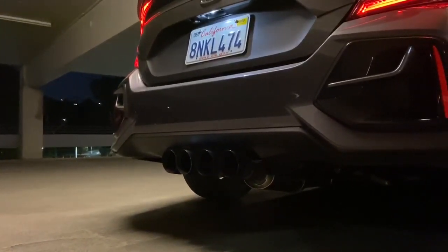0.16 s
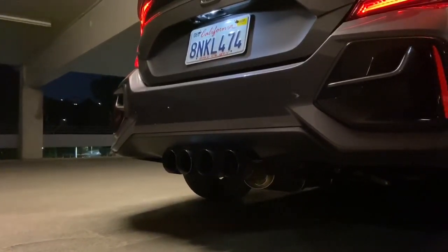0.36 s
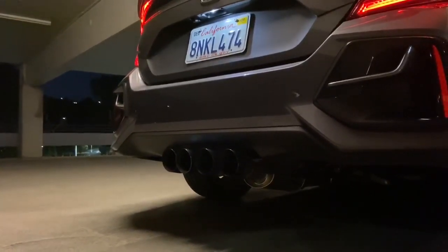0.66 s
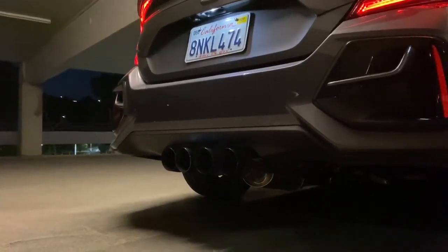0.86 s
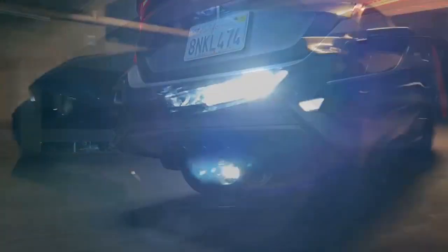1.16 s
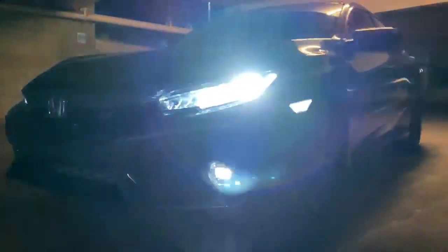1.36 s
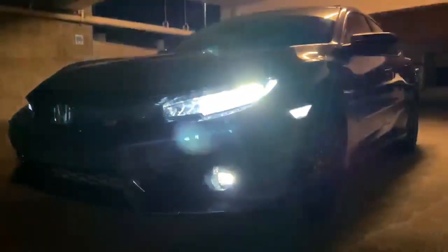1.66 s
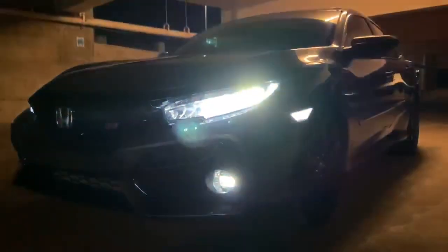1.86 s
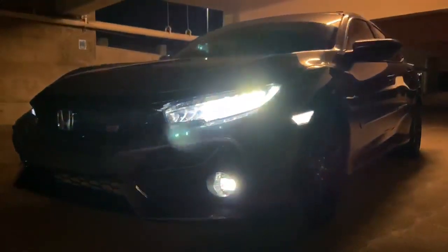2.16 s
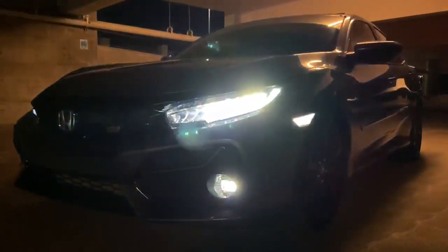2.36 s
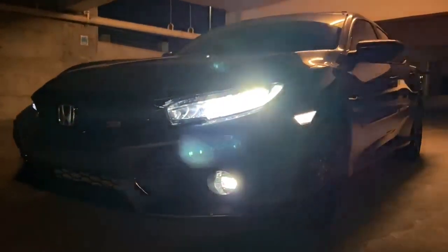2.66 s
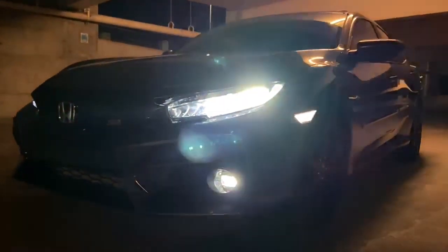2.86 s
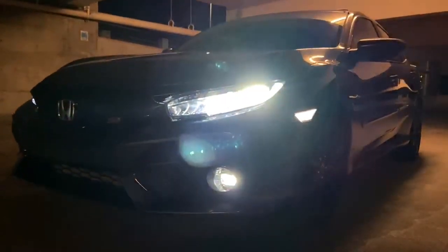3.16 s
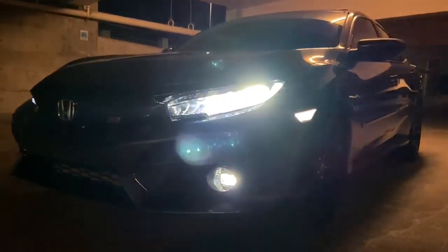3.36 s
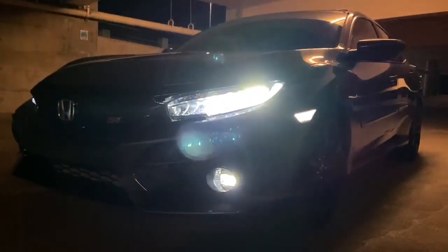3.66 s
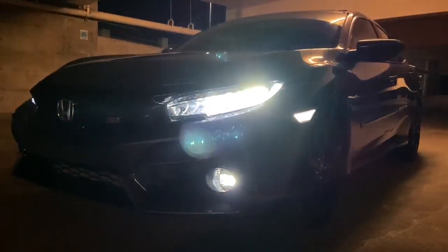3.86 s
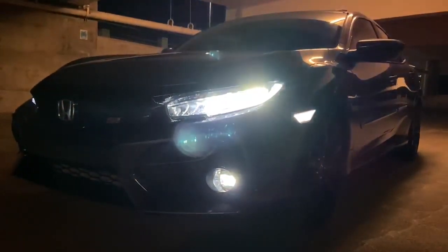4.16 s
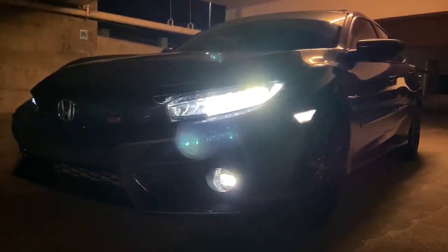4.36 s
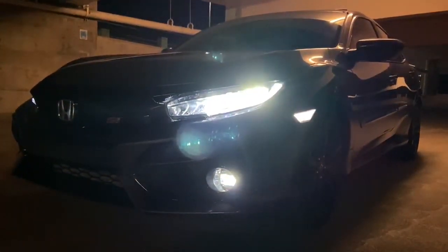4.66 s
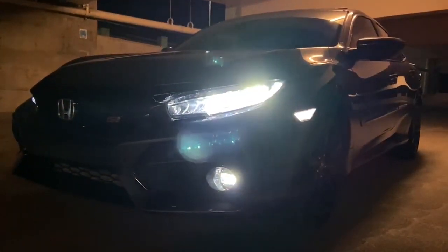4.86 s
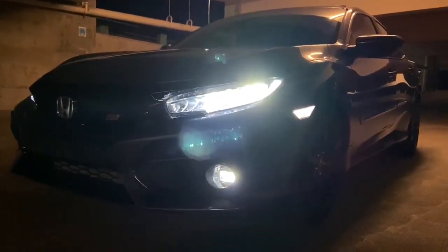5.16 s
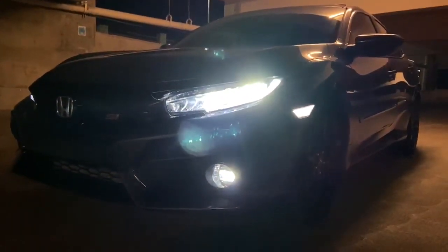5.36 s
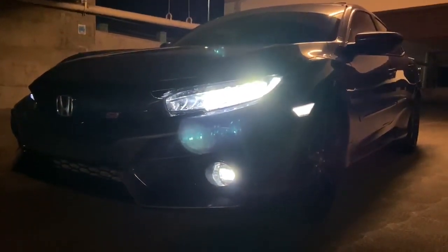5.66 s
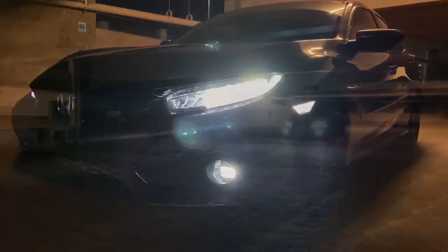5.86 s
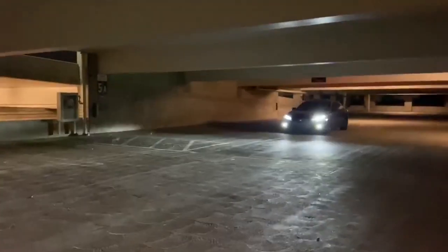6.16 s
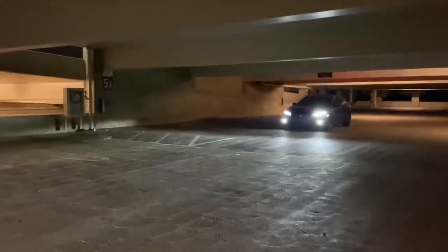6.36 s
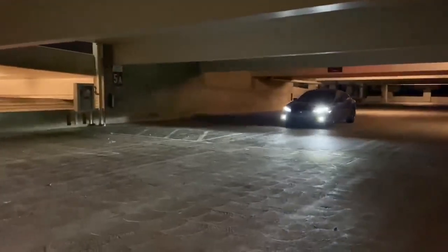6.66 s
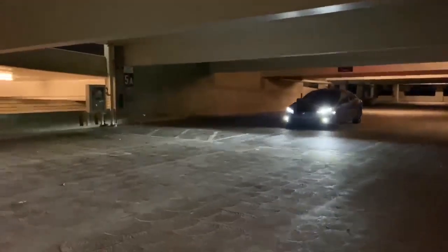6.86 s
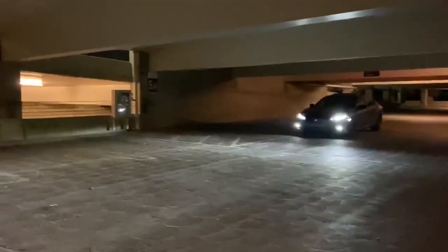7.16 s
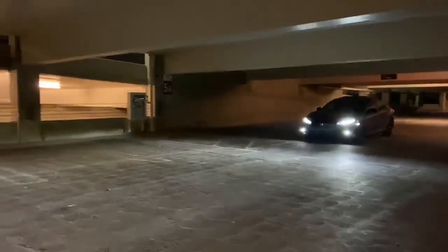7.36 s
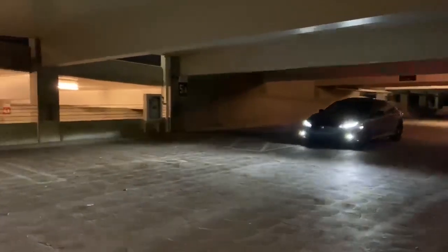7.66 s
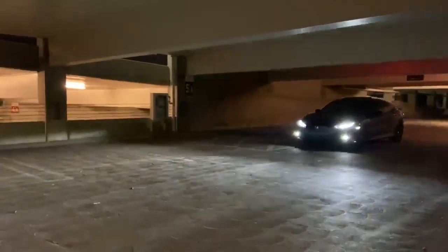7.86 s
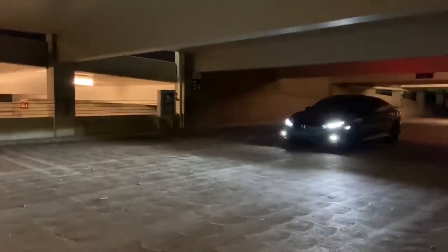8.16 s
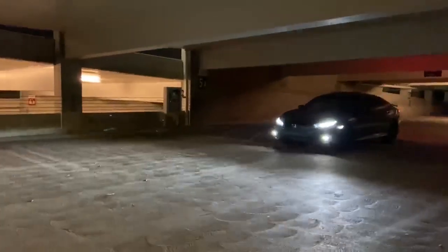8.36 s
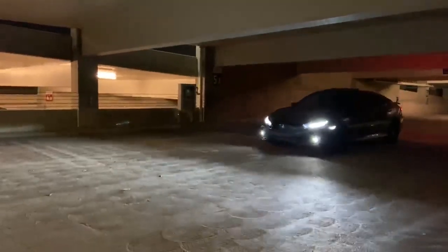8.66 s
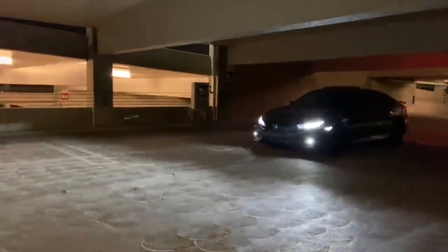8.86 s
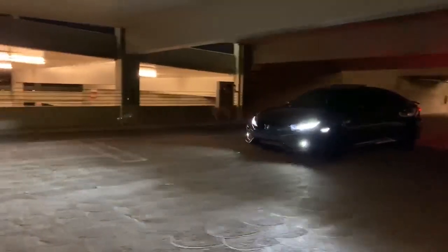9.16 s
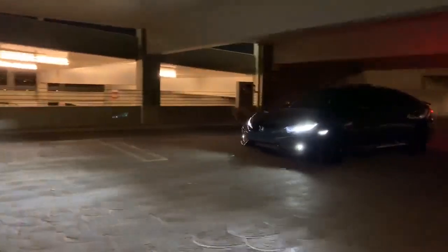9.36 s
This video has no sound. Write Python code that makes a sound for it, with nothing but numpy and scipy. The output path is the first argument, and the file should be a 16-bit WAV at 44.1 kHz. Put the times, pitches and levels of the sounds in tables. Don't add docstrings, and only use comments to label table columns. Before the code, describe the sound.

From 0 to 1.3 s, close behind the tailpipes, deep exhaust beats slow and separate into a lumpy idle, with faint airy hiss and very high injector ticking. A crossfade moves beside the bonnet: a low clack at 1.3 s and tiny relay ticks to 1.6 s. The first blip barks roughly upward from about 1.6 s, air rushing with boost, peaking near 2.4 s as a short bypass puff escapes. The pitch sinks smoothly, its hum fading in and out, until 3.7 s. A second, higher blip peaks near 4.2 s; a click and longer fluttering puff follow, then another slow fall to 5.8 s. From about 6 s to the end, across the reverberant concrete garage, the car creeps nearer: a low, unsteady drone with rumble, soft hiss and faint belt whine, growing fuller and boomier from 9 s. Stereo sound, centred bass, dull patchy treble.

```python
import sys
import numpy as np
from scipy import signal
from scipy.fft import rfft, irfft, next_fast_len
from scipy.io import wavfile
from scipy.ndimage import uniform_filter1d, map_coordinates

SR = 44100
rng = np.random.default_rng(int(sys.argv[2]) if len(sys.argv) > 2 else 0)


def materialize(psi):
    bounded = np.clip(np.atleast_2d(psi).T, -1, 1)
    quanta = np.round(bounded * 32767).astype(np.int16)
    wavfile.write(sys.argv[1], SR, quanta)


def linear_from_db(decibels):
    return 10 ** (np.asarray(decibels, float) / 20)


N = 418509

# freq_hz, likeness
LIKENESS = [(60, 1), (130, 0.83), (290, 0.71), (640, 0.4), (1400, 0.38), (2500, 0.2), (4500, 0.39),
            (15000, 0.11)]
# freq_hz, t60_s
REVERB = [(50, 4), (500, 1.43), (3000, 0.56), (12000, 0.18)]

# time_s, firing_hz, exhaust_db
REAR_SPEED = [(0, 43.59, -13.5), (.2, 39.3, -19.5), (.4, 36.5, -18.5), (.6, 32.51, -21), (.9, 29.48, -20),
              (1.04, 28.62, -21.5), (1.35, 26.7, -36)]
# freq_hz, level_db
REAR_PIPE = [(20, -45), (40, -17), (58, 0), (72, -4), (88, -3), (125, -7), (175, -16), (222, -16),
             (265, -28), (350, -25), (460, -37), (1000, -100)]
# freq_hz, level_db
REAR_RUSH = [(200, -42), (500, -11), (900, -22), (2000, -29.5), (3500, -35), (7000, -41), (11000, -45),
             (15700, -45)]
# freq_hz, level_db
INJECTOR_COLOUR = [(8000, -39), (9700, 0), (12400, 7), (14000, 1), (15700, -6)]

# time_s, firing_hz
BLIP_SPEED = [(1.5, 28), (1.6, 33), (1.824, 58), (2.039, 85.8), (2.208, 114.2), (2.308, 127.6),
              (2.383, 132.2), (2.47, 131.3), (3, 116.1), (3.715, 97.7), (3.77, 100), (4.064, 143.6),
              (4.13, 150.5), (4.19, 153.4), (4.513, 144.6), (5.047, 127.7), (5.71, 108.8), (6.2, 95.5)]
# open_s, vent_s, bark_db, rumble_db, ease_s
THROTTLE_BLIPS = [
    (1.556, 2.375, -18, -25.5, 2.36),
    (3.722, 4.29, -16.5, -28.5, 4.1),
]
# firing_hz, level_db
COASTING_BARK = [(28, -45), (98, -33), (101.5, -27), (103.5, -35), (106.5, -23), (109.3, -34), (113, -28),
                 (135, -33)]
# freq_hz, width_hz, gain_db
FRONT_PIPE = [(60, 25, -8), (100, 30, -8), (258, 20, -1), (286, 16, -1), (330, 30, -1), (386, 22, -1),
              (435, 40, -11)]
# freq_hz, level_db
BODY_RUMBLE = [(25, -61), (45, -29), (56, 2), (70, -7.5), (90, 0.5), (150, -5.5), (200, -12.5), (300, -15),
               (500, -71.5)]
# freq_hz, level_db
FRONT_RUSH = [(200, -9.5), (420, -2), (700, -3.5), (1000, -8), (1240, -8.5), (1450, -12.5), (1880, -12),
              (3000, -16.5), (6500, -23.5), (10000, -27.5), (15700, -28)]
# freq_hz, width_hz, gain_db
BAY_PANELS = [(605, 30, 2), (768, 25, 4), (1240, 70, 3), (1560, 55, 4), (1860, 70, 4), (2260, 70, 0),
              (2660, 70, 1), (2890, 40, 1), (3770, 40, 2), (6420, 50, 4)]
# time_s, peak_db, freq_hz, sharpness_q
CLICKS = [
    (1.333, -29, 800, 1.2),
    (1.485, -39, 4500, 3),
    (1.545, -38, 6500, 5),
    (1.578, -36, 6500, 5),
    (1.62, -38, 6300, 5),
    (2.295, -30, 11800, 3),
    (4.245, -23, 6000, 3),
]
# firing_hz, level_db
FIRING_TONE = [(28, -57), (41, -30), (58, -16), (78, -12.5), (100, -14.5), (120, -15), (140, -16.5),
               (153, -15.5)]
# firing_hz, half_width_hz, depth_db
TONE_NULLS = [(67, 8, 6), (85.8, 6, 7), (98, 3, 4), (103.3, .9, 7), (106.5, 1, 14), (109, 1.5, 26),
              (119.7, 1.2, 12), (126, 2, 4), (131.6, .5, 8), (137.1, 2, 10), (147.5, 2.8, 14),
              (151.3, .6, 7)]
# firing_hz, level_db
SECOND_ORDER = [(28, -36), (33, -30), (60, -31.5), (95, -47.5), (108, -35.5), (118, -43), (128, -28),
                (137, -46.5), (145, -30), (153, -48)]
# time_s, length_s, level_db
PUFFS = [
    (2.319, 0.05, -23.5),
    (4.277, 0.082, -30.5),
]
# freq_hz, width_hz, gain_db
INTAKE_PIPE = [(630, 30, 6), (765, 30, 5), (1240, 120, -8), (1555, 55, -6), (1870, 80, -9), (2660, 60, -9),
               (3320, 80, -12), (6450, 150, -14)]
# freq_hz, left_over_right_db
STEREO_LEAN = [(60, .4), (125, 1.2), (600, 1.6), (2500, 3.4), (5000, 3), (9000, 0)]

# time_s, firing_hz, drone_db
CREEP_SPEED = [(5.85, 48.68, -39), (6.04, 48.18, -21), (6.2, 47.24, -22), (6.75, 50.47, -24.5),
               (6.9, 52.23, -25), (7.08, 52.05, -24), (7.2, 52.27, -19.5), (7.61, 54.84, -19.5),
               (7.8, 54.8, -23.5), (8.09, 55.46, -16.5), (8.25, 55.12, -21.5), (8.97, 55.04, -22),
               (9.23, 52.65, -14.5), (9.4, 52.4, -23), (9.49, 54.2, -21.5)]
# freq_hz, level_db
FAR_PIPE = [(47, -54), (80, 2.5), (113, 1.5), (134, -5), (167, -3.5), (193, -12.5), (215, -14),
            (700, -30.5), (910, -53), (1540, -120)]
# freq_hz, level_db
FAR_RUSH = [(100, -9.5), (250, 0.5), (600, -7), (1000, -11), (1330, -11.5), (2500, -19), (5500, -30.5),
            (8000, -31.5), (11000, -27.5), (15700, -39)]
# start_s, end_s, order, level_db
ORDER_SWELLS = [(6.879, 7.018, 2, -28), (7.17, 7.247, 2, -38), (8.18, 8.47, 2, -35), (8.68, 8.93, 2, -34),
                (9.304, 9.418, 2, -24), (7.149, 7.181, 3, -35), (7.684, 7.742, 3, -33),
                (7.9, 8.35, 3, -44.5), (8.64, 8.88, 3, -32), (9.15, 9.3, 3, -31.5)]
# start_s, end_s, pitch_hz, level_db
BELT_WHINES = [
    (7.1, 8.2, 1335, -63),
    (8.72, 9.05, 2013, -57.5),
]

# low_edge_hz, share_lost_idle, share_lost_revs, share_lost_far, revs_gain_db
MID_DROPOUTS = [(8300, .94, .8, .9, 0), (8700, .99, .99, .99, 0), (9600, 0, 0, 0, 5), (9900, 0, .2, 0, 2),
                (10400, 0, .42, 0, 3), (10900, 0, .6, .1, 3), (11400, 0, .93, .4, 0), (11950, 0, .03, 0, 4),
                (12500, .97, .92, .6, 0), (12750, .97, .2, .6, 0), (13100, .97, .2, .85, 0),
                (13500, .97, .97, .85, 0), (13800, .3, .05, .2, 6), (14350, .25, .82, .45, 2),
                (15000, .25, .25, .4, 2)]
# low_edge_hz, share_lost_idle, share_lost_revs, share_lost_far, revs_gain_db
SIDE_DROPOUTS = [(6300, .4, .4, .4, 0), (6900, .94, .94, .94, 0), (7600, 0, 0, 0, 4), (9050, 0, .85, 0, 0),
                 (9700, 0, .55, 0, 0), (10400, .98, .65, .65, 0), (11000, .98, .85, .85, 0),
                 (11750, 0, 0, 0, 4), (12150, 0, .88, 0, 0), (14200, 0, 0, 0, 0), (14650, .96, .96, .96, 0)]
# start_s, end_s
REVS_SPAN = [2.33, 6.2]


def unit(x):
    return x / np.sqrt(np.mean(x ** 2) + 1e-20)


def along(points, hz):
    f, v = np.transpose(points)
    return np.interp(np.log(hz + 1), np.log(f + 1), v)


def curves(rows):
    time_s, *columns = np.transpose(rows)
    return [np.interp(np.arange(N) / SR, time_s, c) for c in columns]


def fade(start_s, end_s, edge_s):
    t = np.arange(N) / SR
    return np.clip((t - start_s) / edge_s + 1, 0, 1) * np.clip((end_s - t) / edge_s + 1, 0, 1)


def wobble(rate_hz):
    knots = rng.standard_normal(int(N * rate_hz / SR) + 4)
    return map_coordinates(knots, [np.arange(N) * rate_hz / SR])


def steady(x, window_s):
    power = uniform_filter1d(x ** 2, int(window_s * SR))
    return x / np.sqrt(np.abs(power) + 1e-12)


def filtered(x, response):
    m = next_fast_len(N + SR // 2)
    return irfft(rfft(x, m) * response(np.fft.rfftfreq(m, 1 / SR)), m)[..., :N]


def causal(spectrum):
    def response(hz):
        cepstrum = irfft(np.log(linear_from_db(along(spectrum, hz)) + 1e-6))
        cepstrum[1:len(hz) - 1] *= 2
        cepstrum[len(hz):] = 0
        return np.exp(rfft(cepstrum))
    return response


def resonant(modes):
    def response(f):
        total = 0
        for k, (centre, width, db) in enumerate(modes):
            total = total + (-1) ** k * linear_from_db(db) * 1j * f * width / (centre ** 2 - f * f + 1j * f * width)
        return total
    return response


def stereo_angle(hz):
    return np.arccos(np.clip(along(LIKENESS, hz), -1, 1)) / 2


def rush(spectrum, patchy_db):
    z = signal.stft(rng.standard_normal((2, N)), nperseg=512)[2]
    patches = uniform_filter1d(rng.standard_normal(z.shape[1:]), size=6, axis=0)
    patches = unit(uniform_filter1d(patches, size=12, axis=1))
    pair = signal.istft(z * linear_from_db(patchy_db * patches), nperseg=512)[1][:, :N]

    def colour(hz):
        angle = stereo_angle(hz)
        return linear_from_db(along(spectrum, hz)) * [np.cos(angle), np.sin(angle)]
    mid, side = filtered(pair, colour)
    return unit(np.array([mid + side, mid - side]))


def firings(rate_hz, cylinders_db, scatter_db, jitter):
    at = np.flatnonzero(np.diff(np.floor(np.cumsum(rate_hz) / SR + .9)))
    chance = rng.standard_normal((len(at), 2))
    size = linear_from_db(np.resize(cylinders_db, len(at)) + scatter_db * chance[:, 0])
    at = np.clip(at + jitter * chance[:, 1] * SR / rate_hz[at], 0, N - 1).astype(int)
    return np.bincount(at, size, N)


def tone(rate_hz, db, unsteady_db):
    level = np.sqrt(2) * linear_from_db(db + unsteady_db * wobble(18))
    return level * np.sin(2 * np.pi * np.cumsum(rate_hz) / SR)


def throb(rate_hz, depth):
    return 1 + depth * np.cos(2 * np.pi * np.cumsum(rate_hz) / SR)


def garage(x, wet_db):
    hz, t, z = signal.stft(rng.standard_normal((2, SR)), SR, nperseg=1024)
    angle = stereo_angle(hz)[:, None]
    mid, side = z[0] * np.cos(angle), z[1] * np.sin(angle)
    decay = linear_from_db(-60 * t / along(REVERB, hz)[:, None])
    tail = signal.istft(np.array([mid + side, mid - side]) * decay, SR, nperseg=1024)[1]
    tail = tail / np.linalg.norm(tail[0])
    delayed = np.pad(x, (700, 0))[None]
    return x + linear_from_db(wet_db) * signal.fftconvolve(delayed, tail, axes=1)[:, :N]


def tailpipe_beats(rate_hz, pulse_db):
    lead = SR // 2
    early_hz = np.r_[np.full(lead, rate_hz[0]), rate_hz[:-lead]]
    pulses = -firings(early_hz, [0, -1.5, .8, -.6], scatter_db=2, jitter=.02)
    beats = garage(filtered(pulses, causal(REAR_PIPE)), wet_db=-6)
    return linear_from_db(pulse_db) * steady(np.roll(beats, -lead, axis=1), .61)


def behind():
    rate_hz, pulse_db = curves(REAR_SPEED)
    beats = tailpipe_beats(rate_hz, pulse_db)
    rush_db = -53 + 7 * np.log2(rate_hz / 30)
    hiss = linear_from_db(rush_db) * throb(rate_hz, depth=.12) * rush(REAR_RUSH, patchy_db=0)
    ticking = linear_from_db(-64.5) * throb(rate_hz, depth=.32) ** 2 * rush(INJECTOR_COLOUR, patchy_db=2)
    return (beats + hiss + ticking) * fade(0, 1.45, .12)


def blipped(column, rise_db_per_s, fall_db_per_s, floor_db):
    t = np.arange(N) / SR
    level_db = floor_db
    for blip in THROTTLE_BLIPS:
        climb_db = rise_db_per_s * np.clip(blip[0] - t, 0, None)
        drop_db = fall_db_per_s * np.clip(t - blip[1], 0, None)
        level_db = np.maximum(level_db, blip[column] - climb_db - drop_db)
    return level_db


def bark(rate_hz, load):
    rough = firings(rate_hz, [0, -2.5, 1.5, -1.5], scatter_db=2.5, jitter=.035)
    clean = firings(rate_hz, [0, -.5, .3, -.2], scatter_db=.6, jitter=.006)
    clean = filtered(clean, lambda hz: (1j * hz / 170 / (1 + 1j * hz / 170)) ** 3)
    pulses = load * rough + (1 - load) * clean
    piped = filtered(pulses, lambda hz: resonant(FRONT_PIPE)(hz) / (1 + 1j * hz / 650) ** 2)
    bark_db = blipped(2, rise_db_per_s=330, fall_db_per_s=240, floor_db=along(COASTING_BARK, rate_hz))
    return linear_from_db(bark_db - 2.5) * steady(garage(piped, wet_db=-6), .2)


def body_rumble(choke_db):
    rumble_db = blipped(3, rise_db_per_s=82, fall_db_per_s=16.6, floor_db=-38)
    return linear_from_db(rumble_db + 7 + 2.1 * choke_db) * rush(BODY_RUMBLE, patchy_db=2)


def engine_rush(rate_hz, choke_db):
    throttle = sum(fade(open_s, ease_s, .15) for open_s, *_, ease_s in THROTTLE_BLIPS)
    spooling = sum(fade(open_s, vent_s, .038) for open_s, vent_s, *_ in THROTTLE_BLIPS)
    keep = np.exp(-1 / (.46 * SR))
    boost = signal.lfilter([1 - keep], [1, -keep], spooling * (rate_hz / 100) ** 1.11)
    rush_db = -42 + 4 * np.log2(rate_hz / 28) + 12 * boost + 2 * throttle + choke_db
    panels = filtered(rush(FRONT_RUSH, patchy_db=1.36),
                      lambda hz: np.hypot(1, np.abs(resonant(BAY_PANELS)(hz))))
    return linear_from_db(rush_db) * throb(rate_hz, depth=.05) * unit(panels)


def bonnet_clicks():
    t = np.arange(SR // 20) / SR
    out = np.zeros((2, N))
    for time_s, peak_db, hz, sharpness in CLICKS:
        click = unit(signal.lfilter(*signal.iirpeak(hz, sharpness, SR), rng.standard_normal(len(t)))) / 2
        start = round(time_s * SR)
        out[:, start:start + len(t)] += linear_from_db(peak_db - 60 * t / .05) * click
    return out


def order_drone(rate_hz, load):
    tone_db = along(FIRING_TONE, rate_hz)
    for null_hz, half_width_hz, depth_db in TONE_NULLS:
        width_hz = half_width_hz * (1 + 1.2 * load)
        dip = np.clip(1 - np.abs(rate_hz - null_hz) / width_hz, 0, 1)
        filled = load * (null_hz > 135)
        tone_db = tone_db - depth_db * dip * (1 - filled)
    second_db = along(SECOND_ORDER, rate_hz) + 11.5 * load
    drone = tone(rate_hz, tone_db + 1.5, unsteady_db=2.34) + tone(2 * rate_hz, second_db, unsteady_db=0)
    return garage(drone * fade(1.7, 5.88, .3), wet_db=-27)


def bypass_puffs():
    t = np.arange(N) / SR
    level = 0
    for time_s, length_s, db in PUFFS:
        trail = (t > time_s) * linear_from_db(-60 * np.clip(t - time_s - length_s, 0, 9) / .5)
        level = level + linear_from_db(db) * (fade(time_s, time_s + length_s, .019) + .48 * trail)
    air = filtered(rush([(300, 0), (9000, 0)], patchy_db=2), resonant(INTAKE_PIPE))
    return level * linear_from_db(5.9 * wobble(80)) * unit(air)


def beside():
    rate_hz = uniform_filter1d(curves(BLIP_SPEED)[0], size=1500)
    gain_hz_per_s = uniform_filter1d(np.gradient(rate_hz) * SR, size=3000)
    load = np.clip(gain_hz_per_s / 60, 0, 1)
    choke_db = -3 * sum(fade(ease_s + .033, vent_s - .07, .05) for _, vent_s, *_, ease_s in THROTTLE_BLIPS)
    engine = bark(rate_hz, load) + body_rumble(choke_db) + engine_rush(rate_hz, choke_db)
    engine = engine + bonnet_clicks() + bypass_puffs()
    both = engine * fade(1.27, 5.848, .28) + order_drone(rate_hz, load)
    mid = both.mean(axis=0)
    narrowed = mid + .89 * (both - mid)
    return filtered(narrowed, lambda hz: linear_from_db(along(STEREO_LEAN, hz) * np.array([[.5], [-.5]])))


def swelling(floor_db, order):
    level = linear_from_db(floor_db)
    for start_s, end_s, which, db in ORDER_SWELLS:
        if round(which) == order:
            level = level + linear_from_db(db) * fade(start_s, end_s, .049)
    return 20 * np.log10(level)


def creeping_drone(rate_hz, first_db, nearer_db):
    boom_db = 20 * np.log10(linear_from_db(-52 + nearer_db) + linear_from_db(-46) * fade(8.95, 10, .2))
    orders = {1: first_db, 2: swelling(-39.5, order=2), 3: swelling(-37, order=3), 4: boom_db + 3, 6: boom_db}
    return sum(tone(k * rate_hz, db, unsteady_db=1.76) for k, db in orders.items())


def belt_whine():
    return sum(fade(start_s, end_s, .15) * tone(np.full(N, hz), db, unsteady_db=3.5)
               for start_s, end_s, hz, db in BELT_WHINES)


def across():
    rate_hz, first_db = curves(CREEP_SPEED)
    nearer_db = 1.24 * (np.arange(N) / SR - 6)
    pulse_db = -29 + nearer_db + .13 * (first_db + 23.5)
    pulses = firings(rate_hz, [0, 3, -1.5, 3], scatter_db=2, jitter=.03)
    beats = garage(filtered(pulses, causal(FAR_PIPE)), wet_db=-4)
    beats = linear_from_db(pulse_db - 7) * steady(beats, .3)
    rumble = linear_from_db(pulse_db - 4) * rush(FAR_PIPE, patchy_db=2)
    hiss = linear_from_db(-41 + nearer_db) * throb(rate_hz, depth=.054) * rush(FAR_RUSH, patchy_db=1.1)
    drone = creeping_drone(rate_hz, first_db, nearer_db)
    return (beats + rumble + drone + belt_whine() + hiss) * fade(5.95, 9.6, .12)


def scene():
    return behind() + beside() + across()


def drop_bands(x, dropouts):
    hz, t, z = signal.stft(x, SR, nperseg=1024)
    runs = rng.random((len(dropouts), len(t) // 5 + 1)).repeat(5, axis=1)[:, :len(t)]
    high_edges_hz = [row[0] for row in dropouts[1:]] + [SR]
    for (low_hz, *share_lost, revs_db), high_hz, run in zip(dropouts, high_edges_hz, runs):
        early_s = .22 * (low_hz > 12600)
        place = np.digitize(t, [REVS_SPAN[0] - early_s, REVS_SPAN[1]])
        kept = run >= np.array(share_lost)[place]
        z[(hz > low_hz) & (hz <= high_hz)] *= linear_from_db(revs_db * (place == 1)) * kept
    return signal.istft(z, SR, nperseg=1024)[1][:N]


def band_limit(x):
    return signal.sosfilt(signal.butter(12, 15740, fs=SR, output="sos"), x)


def record(dry):
    x = dry / (1 + np.abs(dry / .6) ** 4) ** (1 / 4)
    x = filtered(x, lambda hz: hz < 15780)
    mid = drop_bands((x[0] + x[1]) / 2, MID_DROPOUTS)
    side = drop_bands((x[0] - x[1]) / 2, SIDE_DROPOUTS)
    return band_limit(np.array([mid + side, mid - side]))


dry = scene()
out = record(dry)
materialize(out)
```